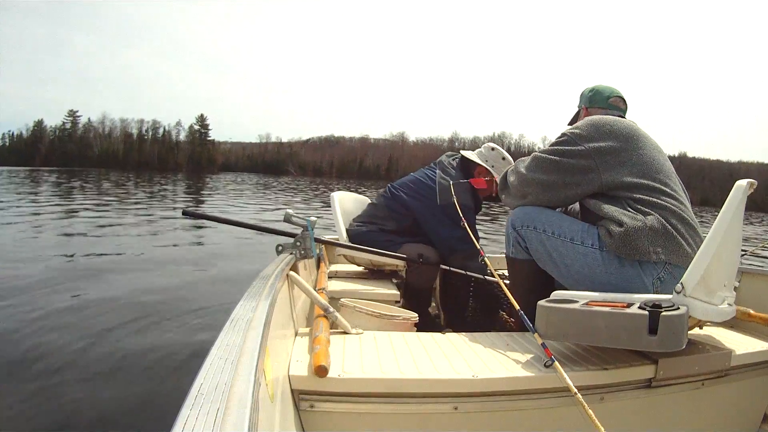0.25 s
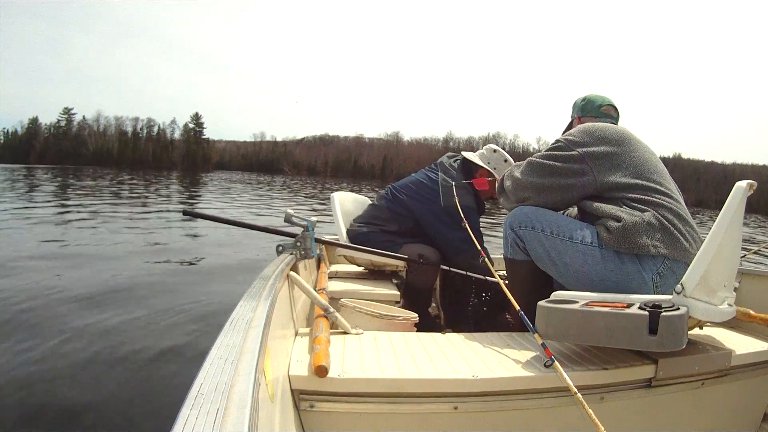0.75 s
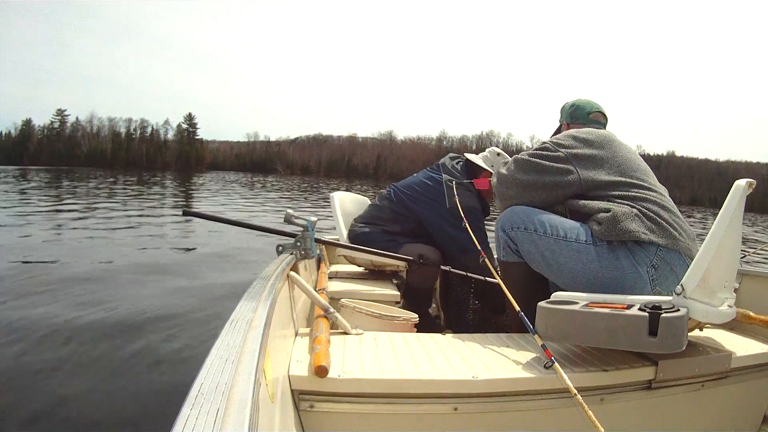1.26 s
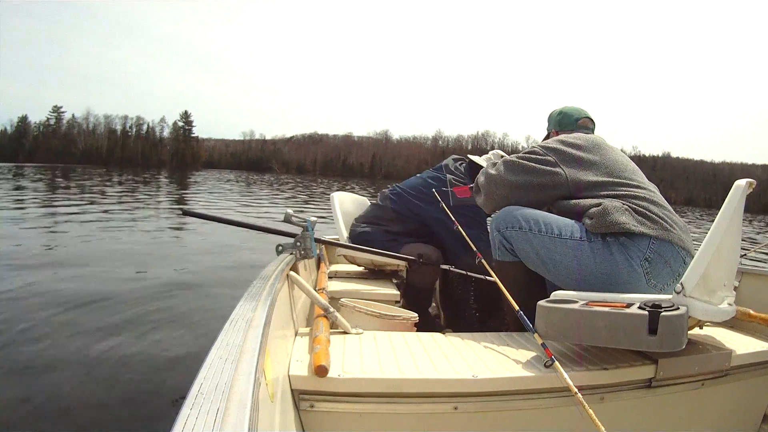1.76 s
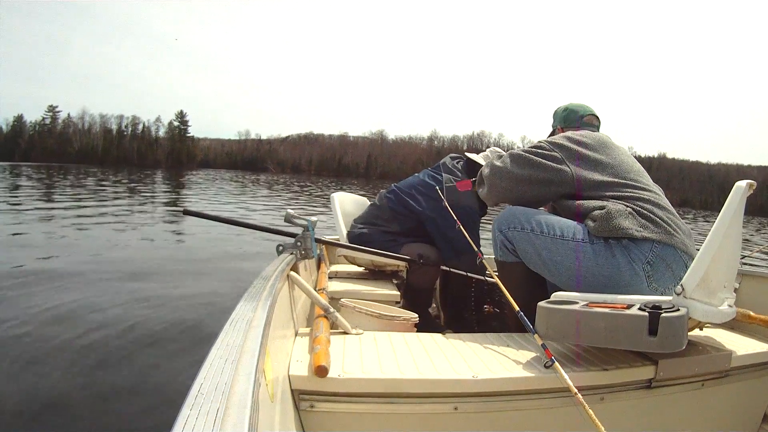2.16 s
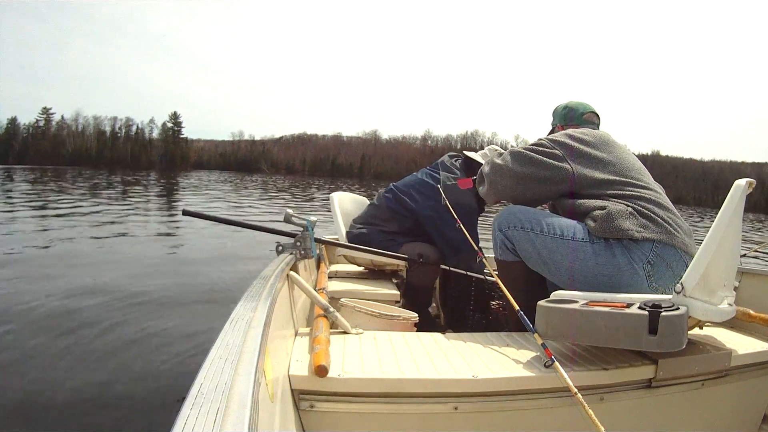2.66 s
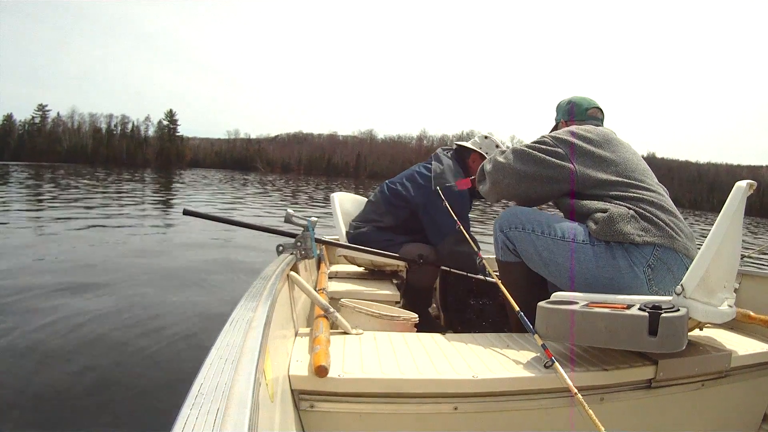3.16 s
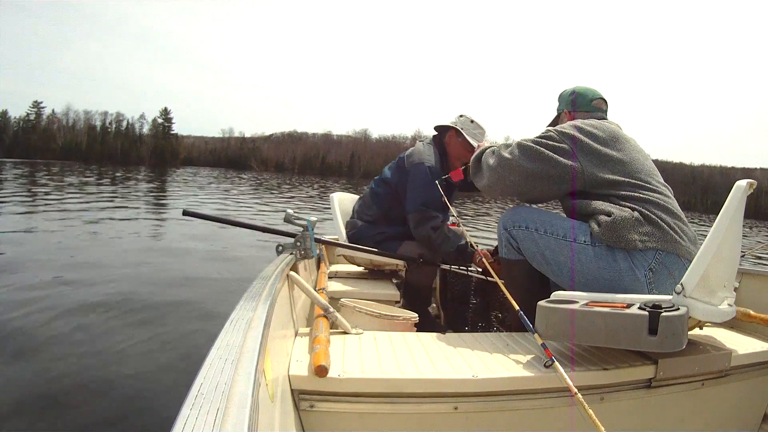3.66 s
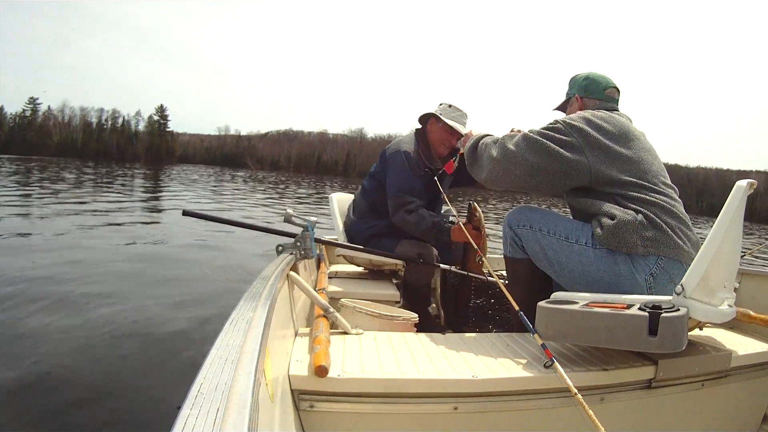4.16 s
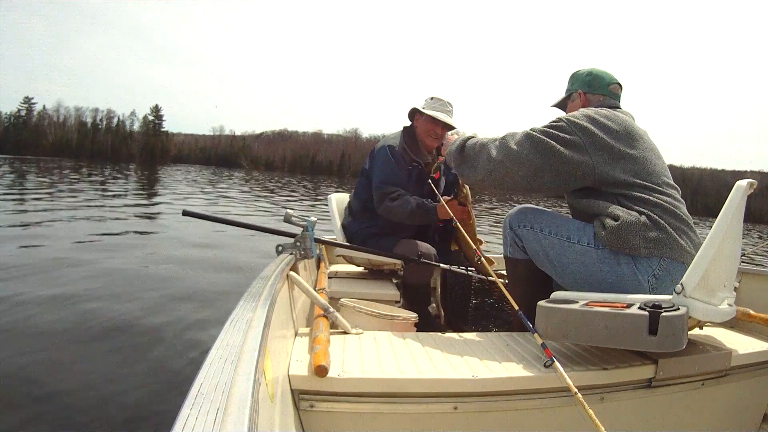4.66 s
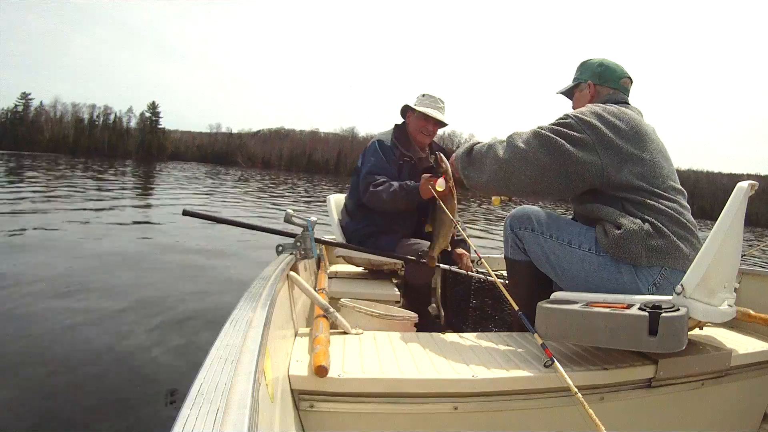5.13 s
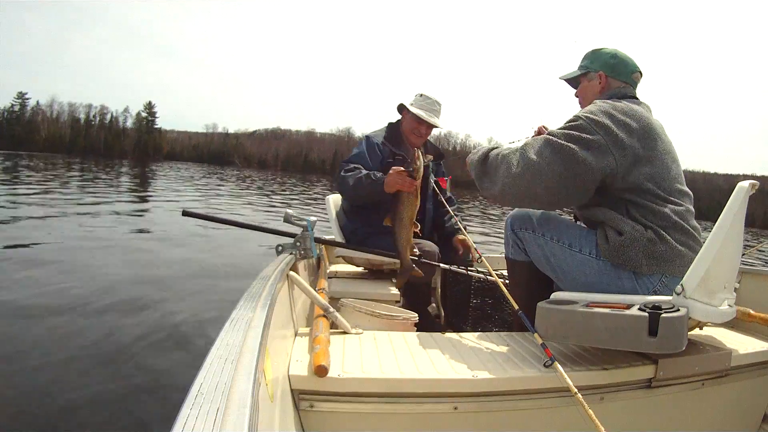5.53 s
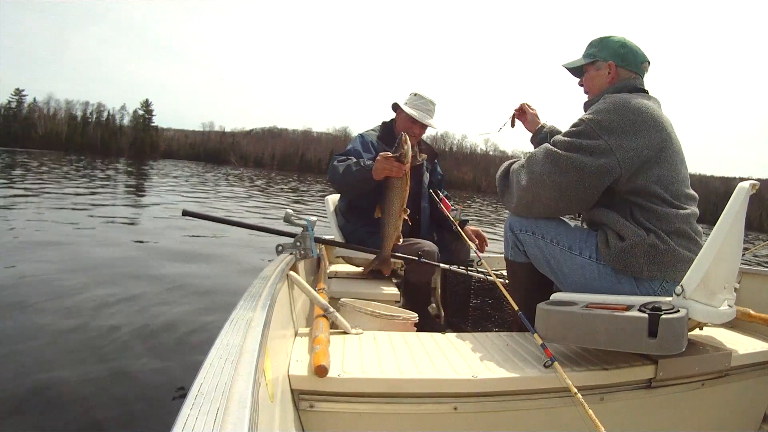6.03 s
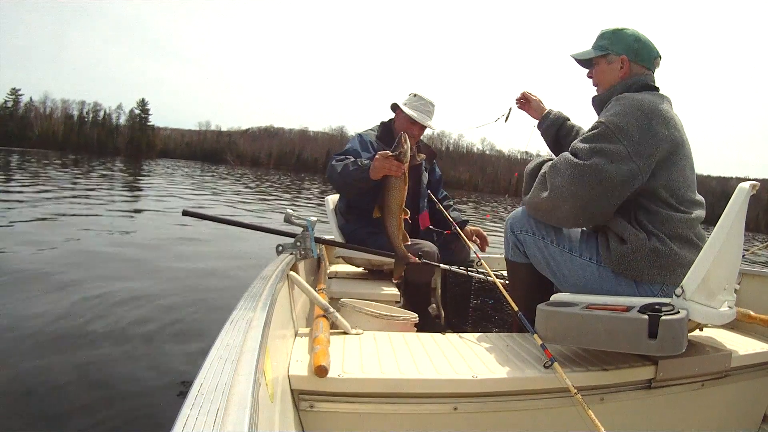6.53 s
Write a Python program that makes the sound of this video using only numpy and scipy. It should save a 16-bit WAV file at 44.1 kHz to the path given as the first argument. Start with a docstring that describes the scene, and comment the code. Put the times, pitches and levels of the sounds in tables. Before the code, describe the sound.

Heard from a microphone mounted on an aluminium boat on a calm lake, a low motor rumble runs throughout with a quick, thin rattle from the mount. The hull booms softly as waves roll under it. Irregular knocks and short hollow thumps from boots and fishing gear come and go, growing strongest near the end, where small metal pieces clink.

```python
"""Two anglers land a fish in an aluminium boat that creeps over a calm lake.
From the start the trolling motor's propeller shakes the hull, a loose part of the microphone mount
ticks on each shake, with short pauses, and the hull drums under chop and waves.
From 0.5 s boots and tackle knock on the panels; from 1.1 s short thumps ring the hull.
The hardest knocks come near 5.3 s and 6.6 s, where small metal gear clinks too."""
import sys
import numpy as np
from scipy import signal
from scipy.fft import rfft, irfft
from scipy.io import wavfile
from scipy.ndimage import uniform_filter1d

SR = 44100
rng = np.random.default_rng(int(sys.argv[2]) if len(sys.argv) > 2 else 0)


def dump(signal):
    """Clip the signal to [-1, 1] and save it as 16-bit WAV at the path in sys.argv[1]."""
    limited = np.clip(np.atleast_2d(signal).T, -1, 1)
    pcm = np.round(limited * 32767).astype(np.int16)
    wavfile.write(sys.argv[1], SR, pcm)


N = 299439
TIME_S = np.arange(N) / SR
EVENT_SAMPLES = SR // 3

# boat vibration: time_s, blade_rate_db, third_shaft_order_db
SHAKE = [(0.06, -12, -19), (0.68, -10.5, -17.5), (0.9, -12.5, -25), (1.03, -9.5, -12), (1.99, -13, -30),
         (2.21, -10, -19.5), (2.87, -13.5, -31), (3.24, -13.5, -29), (3.43, -12.5, -35),
         (3.83, -18.5, -25.5), (3.92, -21, -31.5), (4.13, -13.5, -18), (4.74, -17, -33.5), (4.84, -19, -21),
         (5.63, -17, -20.5), (5.76, -11.5, -28), (6.55, -11, -28.5), (6.79, -21, -19.5)]
# low hull modes: pitch_hz, gain_db, t60_s
HULL_MODES = [(232, -4, 0.15), (278.2, 11.5, 0.26), (287.5, -3.5, 0.2), (300.7, -21, 0.1)]
# side panel and seat modes: pitch_hz, gain_db, t60_s
PANEL_MODES = [(599, -5, 0.35), (823.5, -2, 0.18), (883, -1, 0.087), (1094, -1, 0.15), (1187, -6.5, 0.13),
               (1607, 6, 0.067), (1674, 2, 0.058), (2073, 7, 0.034), (2145, -9, 0.11), (2380, -1, 0.094)]


def propeller(passes, lead_rad=0.56, wander_rad=1.0):
    """The hull heaves at blade rate; the shaft, at half that rate, adds an unsteady third order."""
    blade_db, shaft_db = curves(SHAKE)
    blade_rad = 2 * np.pi * passes
    heave = from_db(blade_db) * np.cos(blade_rad + lead_rad)
    shudder = from_db(shaft_db) * np.cos(3 * blade_rad / 2 + wander_rad * drift(0.31))
    return np.sqrt(2) * (heave + shudder)


def blade_passes(start_passes=.275, limp_passes=.013):
    """Running count of blade passes; the two blades are spaced slightly unevenly."""
    # propeller speed: time_s, blade_rate_hz
    blade_rate = [(0.0, 20.89), (1.2, 21.56), (1.8, 21.02), (2.1, 21.31), (3.0, 20.79), (3.6, 21.42),
                  (3.8, 20.32), (3.9, 24.07), (4.4, 20.53), (4.5, 22.07), (4.8, 20.44), (4.9, 25.25),
                  (5.2, 20.81), (5.6, 21.22), (6.1, 23.81), (6.2, 18.76), (6.3, 23.35), (6.79, 22.43)]
    passes = np.cumsum(curves(blade_rate)[0]) / SR + start_passes
    return passes - limp_passes * np.cos(np.pi * passes)


def mount_rattle(passes, bounce_s=.003, bounce_db=-7.0, settle_db=-15, db_per_shake_db=0.34):
    """On each heave in a spell the loose part lands, bounces and settles, ringing the mount."""
    # rattling spells: start_s, end_s, force_db (at mean shake)
    spells = [(0, 3.69, -30.3), (3.75, 3.93, -30.5), (4.1, 4.37, -32), (4.43, 4.7, -30.5),
              (4.76, 4.89, -31.5), (5.1, 5.23, -32), (5.48, 6.19, -31.5), (6.25, 6.73, -32.3)]
    # main mount modes: pitch_hz, gain_db, t60_s
    body_modes = [(2620, -15.5, 0.0083), (3585, -19.5, 0.022), (3694, -10.5, 0.021), (4743, -11, 0.0067),
                  (5813, -8, 0.011), (6406, -5, 0.0075), (6300, -43, .006)]
    # faint high mount modes: pitch_hz, gain_db, t60_s
    edge_modes = [(9320, -26, .009), (13900, -25, .003)]
    force = np.zeros(N)
    heaves_s = TIME_S[1:][np.diff(np.floor(passes)) > 0]
    shake_db = curves(SHAKE)[0]
    push_db = db_per_shake_db * (shake_db - shake_db.mean())
    for heave_s, jitter in zip(heaves_s, rng.standard_normal((len(heaves_s), 6))):
        for start_s, end_s, force_db in spells:
            if start_s <= heave_s < end_s:
                landing_s = heave_s + 0.00045 * jitter[0]
                flight_s = bounce_s * np.exp(.14 * jitter[1])
                settle_s = landing_s + flight_s * (2.1 + .15 * jitter[4])
                blow = from_db([force_db + push_db[int(heave_s * SR)] + jitter[2]])
                add(force, landing_s, blow)
                add(force, landing_s + flight_s, blow * from_db(bounce_db + 2 * jitter[3]))
                add(force, settle_s, blow * from_db(settle_db + 2 * jitter[5]))
    # each mode's drive drifts: no two landings ring alike
    body = sum(ring(force * from_db(2.5 * drift(60)), [mode]) for mode in body_modes)
    body = filtered(filtered(body, 2480, "high"), 7400, "low", order=3)
    edge = ring(force * from_db(2 * drift(36)), edge_modes)
    return from_db(1) * body + from_db(5) * edge


def mount_chafe(passes, level_db=-56.0, uneven_db=3.5, slip_db=-3.0, sharpness=90):
    """The loose part rasps thinly as it lands, and again as it slips between landings."""
    swing = np.cos(2 * np.pi * passes)
    landing = np.exp(sharpness * (swing - 1))
    slip = from_db(slip_db) * np.exp(-sharpness * (swing + 1))
    strength = unit_rms(from_db(curves(SHAKE)[0] + uneven_db * drift(11)))
    rasp = noise([(8000, -14.0), (12500, -8.5), (13800, -1.5), (15500, -9)])
    return from_db(level_db) * strength * (landing + slip) * rasp


def hull_drum(throb, throb_db=0.87, wave_rise_s=0.027, wave_fall_s=0.04):
    """Motor and chop drive the low hull modes; each wave rolling under swells them to a boom."""
    # drive from motor and chop: time_s, level_db
    chop = [(0.1, -41), (0.49, -41.5), (1.44, -47), (1.79, -39.5), (2.18, -46), (2.6, -41.5), (3.63, -45.5),
            (4.82, -39), (4.9, -38), (5.65, -37.5), (6.11, -47), (6.7, -43.5)]
    # waves under the hull: crest_s, level_db
    waves = [(.36, -29.5), (.62, -33), (.99, -28.5), (1.84, -30.5), (3.09, -36.5), (3.3, -36.5),
             (3.96, -32.5), (4.27, -34), (4.52, -33.5), (5.4, -31), (5.93, -32.5), (6.23, -35), (6.41, -36)]
    power = from_db(curves(chop)[0] + 3) ** 2
    for crest_s, level_db in waves:
        width_s = np.where(TIME_S < crest_s, wave_rise_s, wave_fall_s)
        swell = from_db(level_db) * np.exp(-.5 * ((TIME_S - crest_s) / width_s) ** 2)
        power += swell ** 2
    hull = filtered(ring(rng.standard_normal(N), HULL_MODES), [215, 365], "band", order=3)
    return evened(hull, span_s=0.077) * np.sqrt(power) * from_db(throb_db * throb - 1.53)


def knocks(panel_t60_s=.25, snap_band_hz=(2550, 4060), snap_t60_s=0.062, crack_db=-11.0):
    """Boots and tackle hit: the contact snaps, the struck thing rings, the panels answer."""
    # knocks: start_s, ring_db, ring_hz, t60_s, panel_db, panel_hz, snap_db
    hits = [(.539, -41.5, 2680, .11, -55, 1000, -53), (.900, -46, 2500, 0.2, -60, 1000, -50),
            (.995, -54, 1160, 0.23, -50, 1160, -65), (1.372, -43, 4200, .064, -48.5, 1200, -50),
            (1.972, -35.5, 2240, 0.091, -64, 1100, -43), (2.734, -35, 2180, .17, -44, 1110, -52),
            (2.876, -40, 3420, 0.061, -52, 1200, -52), (3.058, -38.5, 2340, 0.11, -34, 955, -46),
            (3.956, -41, 567, 0.34, -51, 1150, -65), (4.58, -44.5, 2280, 0.095, -57, 1000, -60),
            (5.308, -47, 1900, .12, -45, 990, -59), (5.338, -31, 2230, 0.069, -36.5, 1220, -48),
            (5.431, -38.5, 2150, 0.085, -63, 1000, -65), (5.869, -42.5, 1520, 0.18, -51, 1000, -65),
            (6.160, -47, 1800, .08, -39.5, 865, -63), (6.608, -25.5, 2330, 0.11, -37.5, 1130, -44),
            (6.708, -46, 1950, .17, -46.5, 1000, -60)]
    rings, snaps = np.zeros((2, N))
    for start_s, ring_db, ring_hz, t60_s, panel_db, panel_hz, snap_db in hits:
        thing = struck(ring_hz, t60_s, rise_s=0.0011, width=1.07, below=1.35, above=1.68, modes_db=-8.5)
        panel = struck(panel_hz, panel_t60_s, rise_s=0.0074, width=1.2, below=1.26, above=1.6, modes_db=-5)
        grit = unit_rms(filtered(rng.standard_normal(EVENT_SAMPLES), snap_band_hz, "band", order=3))
        add(rings, start_s, from_db(ring_db) * thing)
        add(rings, start_s, from_db(panel_db) * panel)
        add(snaps, start_s, from_db(snap_db) * grit * decay(snap_t60_s))
    hollow = filtered(rings, 2600, "low", order=10)
    crack = filtered(rings, [2700, 4500], "band", order=3)
    return snaps + hollow + from_db(crack_db) * crack


def struck(pitch_hz, t60_s, rise_s, width, below, above, modes_db, tail_db=-10.0, cluster_db=-4.0):
    """Close modes at one pitch, nearby panel modes, a dense tail; width, below, above: pitch ratios."""
    dense, close = rng.standard_normal((2, EVENT_SAMPLES))
    envelope = decay(t60_s) * (1 - np.exp(-TIME_S[:EVENT_SAMPLES] / rise_s))
    cluster = filtered(close, [pitch_hz / width, pitch_hz * width], "band")
    cluster = evened(cluster, span_s=0.026) * envelope
    panels = from_db(modes_db) * ring(scuff(t60_s=0.019), PANEL_MODES)
    tail = from_db(tail_db) * dense * envelope * np.sqrt(SR / (2 * pitch_hz))
    # soft boots stir the low modes, hard tackle the high ones
    boat = filtered(panels + tail, [pitch_hz / below, pitch_hz * above], "band")
    return boat + from_db(cluster_db) * cluster


def hull_thumps(hull_db=-4.0, panel_db=-13.0):
    """Short thumps, often a shaft turn apart, from motor bracket or ripples, ring hull and panel."""
    # thumps: start_s, force_db
    thumps = [(1.065, -38), (2.39, -35), (2.486, -36), (2.585, -36), (4.494, -39.5), (4.785, -36.5),
              (4.881, -33.5), (5.261, -38.5), (5.453, -36), (5.511, -38), (6.345, -40), (6.649, -34.5)]
    force = np.zeros(N)
    for start_s, force_db in thumps:
        add(force, start_s, from_db(force_db) * scuff(t60_s=0.018))
    hull = filtered(ring(force, HULL_MODES), [240, 450], "band")
    panel = filtered(ring(force, PANEL_MODES), [1450, 1750], "band")
    return from_db(hull_db) * hull + from_db(panel_db) * panel


def gear_clinks(high_db=-4.0, chatter_db=3.5):
    """A small steel piece chatters as it touches and rings in two clear modes."""
    # gear contacts: start_s, level_db, low_hz, high_hz, t60_s
    contacts = [(5.338, -54.5, 5340, 13470, 0.075), (6.673, -55, 5420, 13600, 0.14),
                (6.714, -50, 5220, 13810, 0.054), (6.716, -55, 5770, 13810, 0.072)]
    out = np.zeros(N)
    for start_s, level_db, low_hz, high_hz, t60_s in contacts:
        touch = signal.unit_impulse(EVENT_SAMPLES) + from_db(chatter_db) * scuff(t60_s=.07)
        modes = [(low_hz, 0, t60_s), (high_hz, high_db, t60_s)]
        add(out, start_s, from_db(level_db) * ring(touch, modes))
    return out


def hull_rumble():
    """Low hull noise of slowly changing level."""
    # rumble level: time_s, level_db
    levels = [(0, -35.5), (3.4, -39), (4.6, -36.5), (6.2, -36.5), (6.79, -33.5)]
    # rumble spectrum: freq_hz, density_db
    spectrum = [(50, 5), (68, 5), (88, 1.5), (115, -3.5), (135, -8.5), (152, -3), (178, -14.5), (220, -18),
                (350, -20), (700, -41)]
    return from_db(curves(levels)[0]) * noise(spectrum)


def lapping(throb, level_db=-56, throb_db=2.5, lap_swing_db=5.5, wash_swing_db=.5):
    """Fine lapping washes along the sides and keeps the panels whispering; the whisper throbs."""
    # wash spectrum: freq_hz, density_db
    spectrum = [(350, 2), (550, 1.5), (750, -2), (1000, -3), (1400, -1.5), (1800, 1), (2400, -5),
                (2700, -11), (4000, -13), (7000, -16), (13500, -18.5), (15500, -18)]
    laps = rng.standard_normal(N) * from_db(lap_swing_db * drift(37))
    panels = filtered(ring(laps, PANEL_MODES), [950, 2200], "band")
    whisper = unit_rms(panels * from_db(throb_db * throb))
    wash = noise(spectrum) * from_db(wash_swing_db * drift(8.1))
    return from_db(level_db) * (wash + from_db(-1) * whisper)


def ring(force, modes):
    """Drive one damped sine resonator per (pitch_hz, gain_db, t60_s)."""
    out = 0
    for pitch_hz, gain_db, t60_s in modes:
        radius = from_db(-60 / (t60_s * SR))
        step_rad = 2 * np.pi * pitch_hz / SR
        feedback = [1, -2 * radius * np.cos(step_rad), radius ** 2]
        out += from_db(gain_db) * signal.lfilter([0, radius * np.sin(step_rad)], feedback, force + 1e-18)
    return out


def scuff(t60_s):
    """Brief rough contact force, unit energy."""
    force = rng.standard_normal(EVENT_SAMPLES) * decay(t60_s)
    return force / np.linalg.norm(force)


def decay(t60_s):
    """Exponential decay, one event long."""
    return from_db(-60 * TIME_S[:EVENT_SAMPLES] / t60_s)


def noise(spectrum):
    """Noise shaped by (freq_hz, density_db) points, rms 1."""
    freq_hz, density_db = np.transpose(spectrum)
    bins_hz = np.maximum(np.fft.rfftfreq(N, 1 / SR), 1)
    gain_db = np.interp(np.log(bins_hz), np.log(freq_hz), density_db, left=-np.inf, right=-np.inf)
    return unit_rms(irfft(rfft(rng.standard_normal(N)) * from_db(gain_db), N))


def drift(corner_hz):
    """Smooth random wander, rms 1."""
    bins_hz = np.fft.rfftfreq(N, 1 / SR)
    return unit_rms(irfft(rfft(rng.standard_normal(N)) / (1 + (bins_hz / corner_hz) ** 2), N))


def filtered(x, edges_hz, kind, order=2):
    """Causal Butterworth filter."""
    return signal.sosfilt(signal.butter(order, edges_hz, kind, fs=SR, output="sos"), x)


def evened(x, span_s):
    """Hold the running rms at 1."""
    power = np.abs(uniform_filter1d(x ** 2, int(span_s * SR) + 1))
    return x / np.sqrt(power + 1e-20)


def curves(rows):
    """Interpolate (time_s, values...) rows to every sample."""
    times_s, *columns = np.transpose(rows)
    return [np.interp(TIME_S, times_s, column) for column in columns]


def add(track, start_s, sound):
    """Mix a sound into a track."""
    start = int(np.clip(start_s * SR, 0, N - 1))
    track[start:start + len(sound)] += sound[:N - start]


def unit_rms(x):
    """Scale to rms 1."""
    return x / np.sqrt(np.mean(x ** 2) + 1e-20)


def from_db(db):
    """Decibels to gain."""
    return 10 ** (np.asarray(db) / 20)


def scene():
    """Mono sum of sounds carried through the boat; open water returns no echo."""
    passes = blade_passes()
    throb = np.cos(2 * np.pi * passes - 2.1)   # one level swing per blade pass
    motor = propeller(passes) + hull_rumble()
    mount = mount_rattle(passes) + mount_chafe(passes)
    hull = hull_drum(throb) + lapping(throb) + hull_thumps()
    return (motor + mount + hull + knocks() + gear_clinks())[None]


def record(dry):
    """Steep low-pass on the top treble."""
    cutoff_hz = 15100
    return signal.sosfilt(signal.ellip(10, .1, 90, cutoff_hz, fs=SR, output="sos"), dry)


dry = scene()
out = record(dry)
dump(out)
```